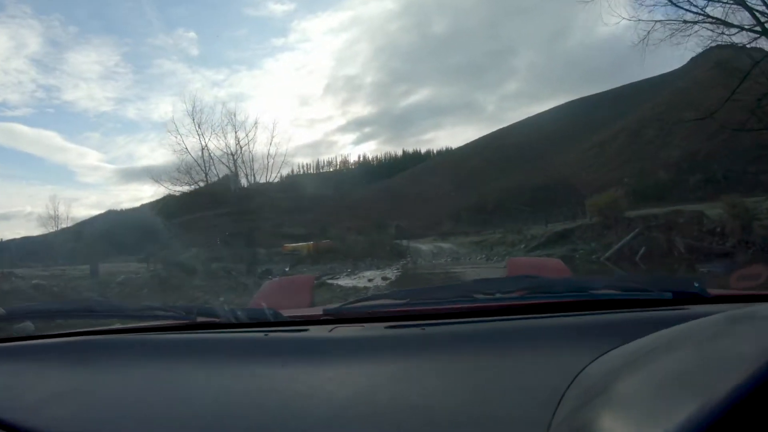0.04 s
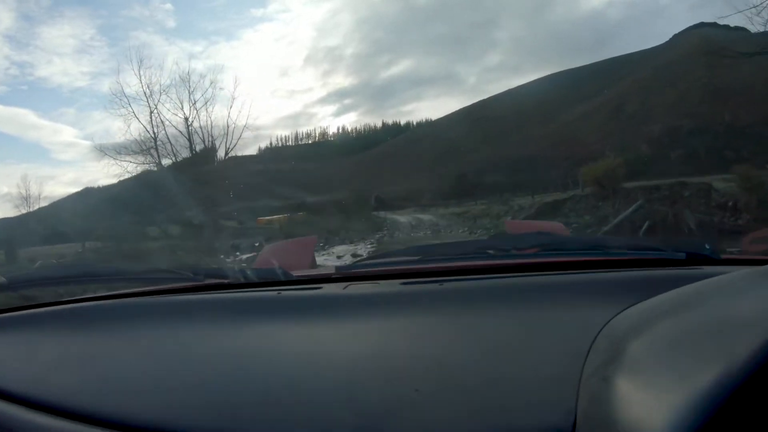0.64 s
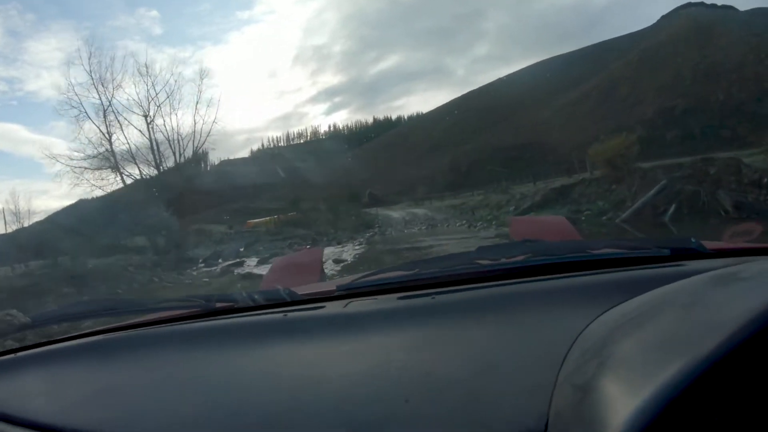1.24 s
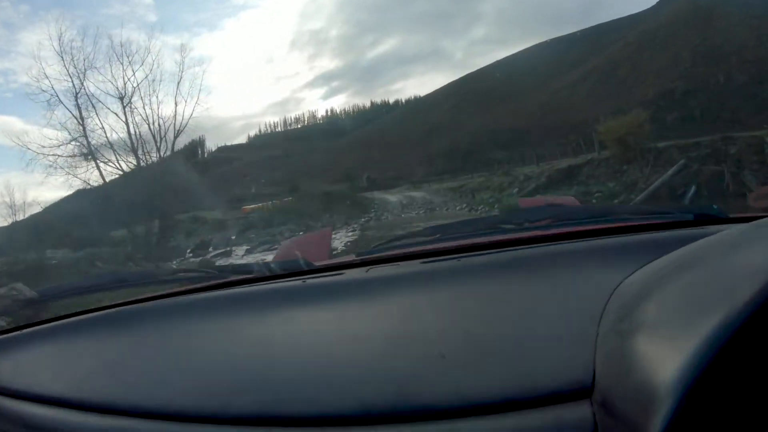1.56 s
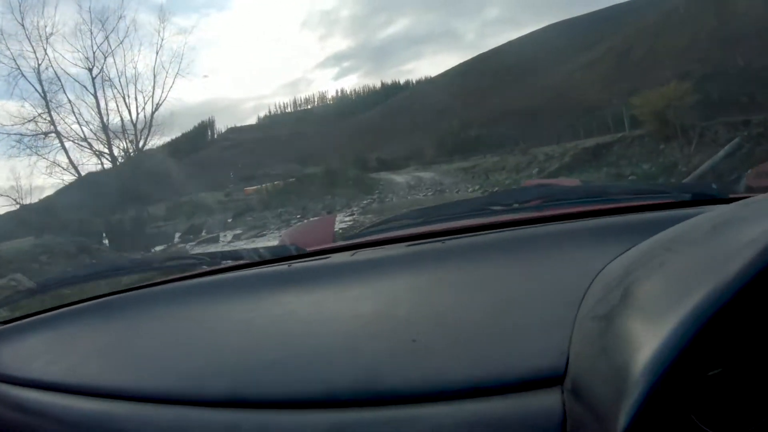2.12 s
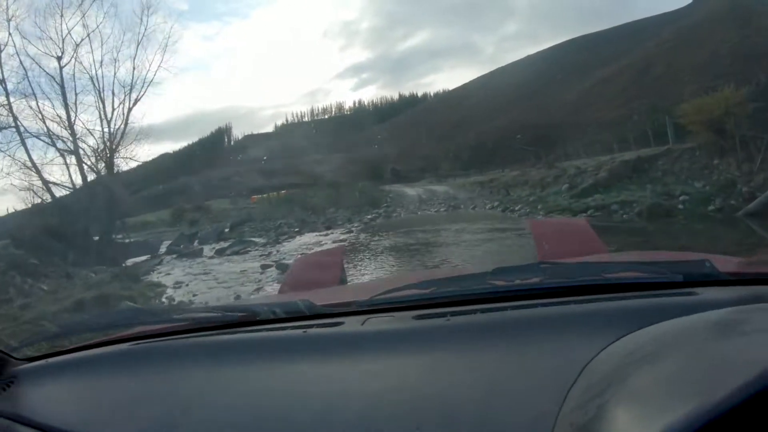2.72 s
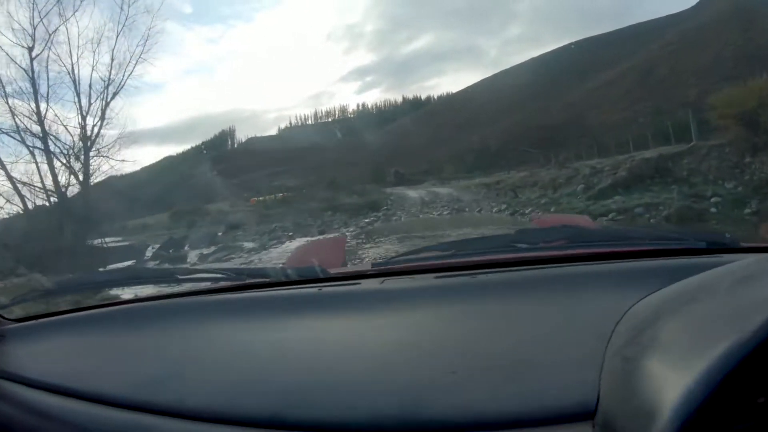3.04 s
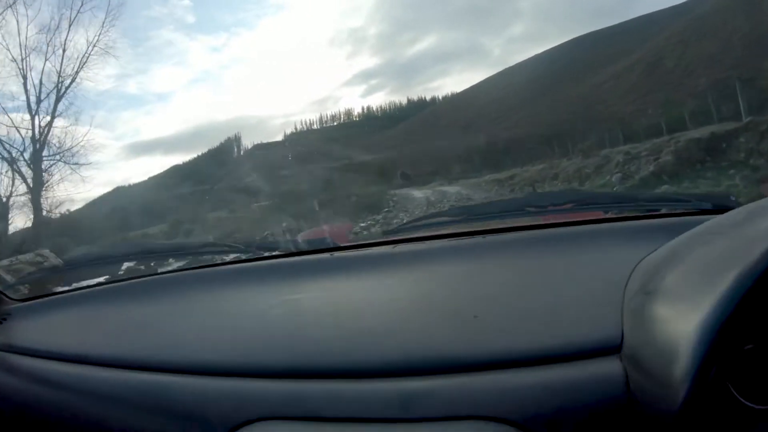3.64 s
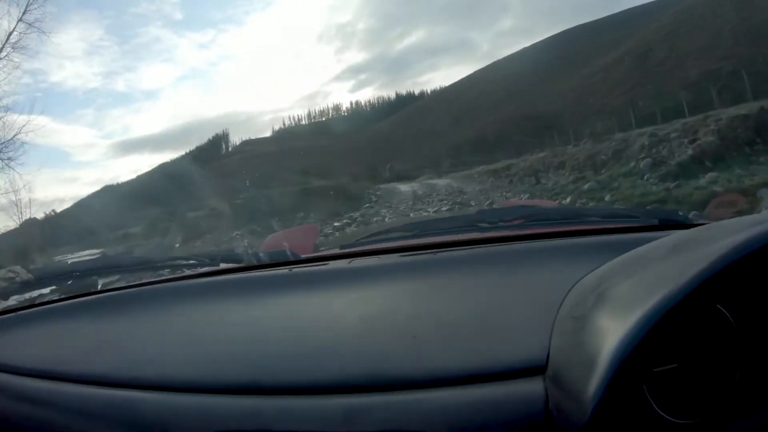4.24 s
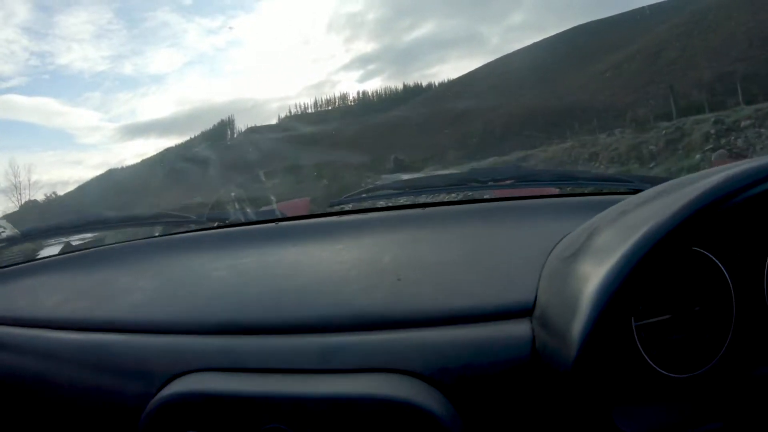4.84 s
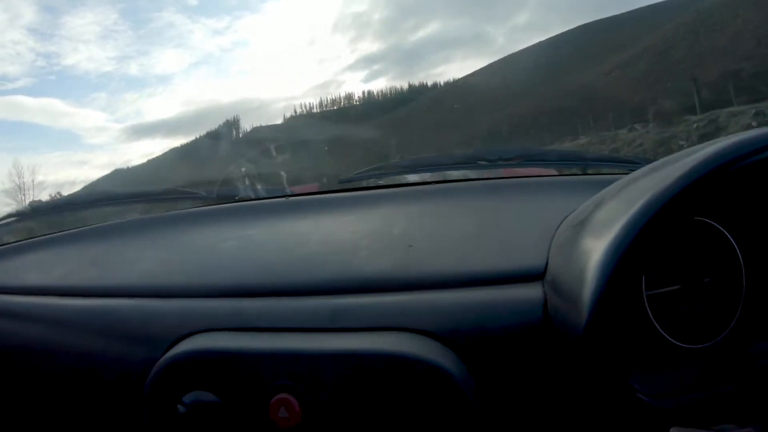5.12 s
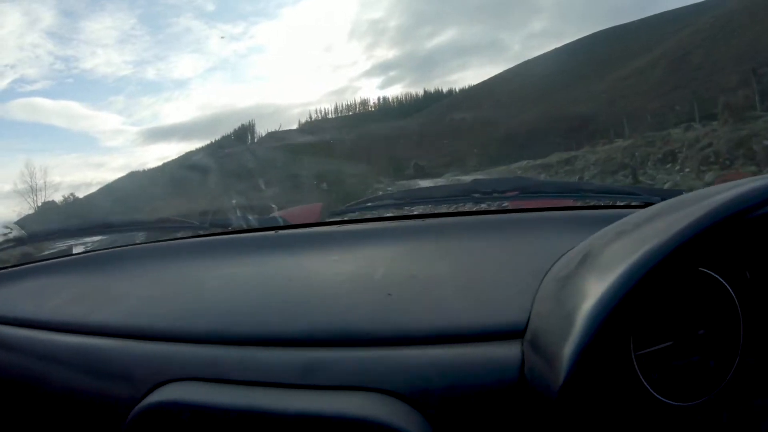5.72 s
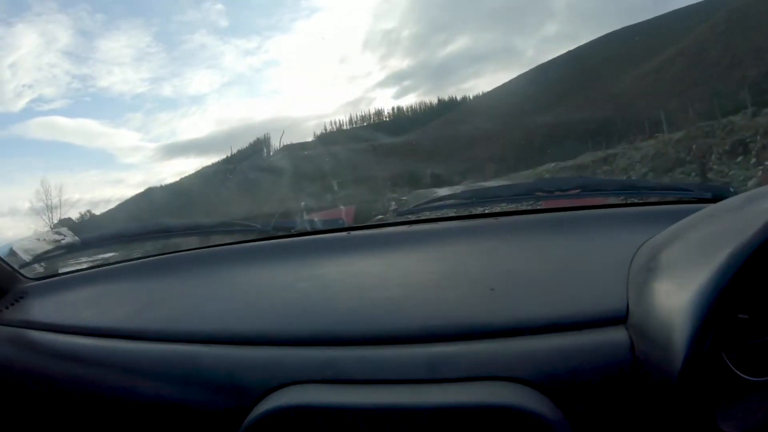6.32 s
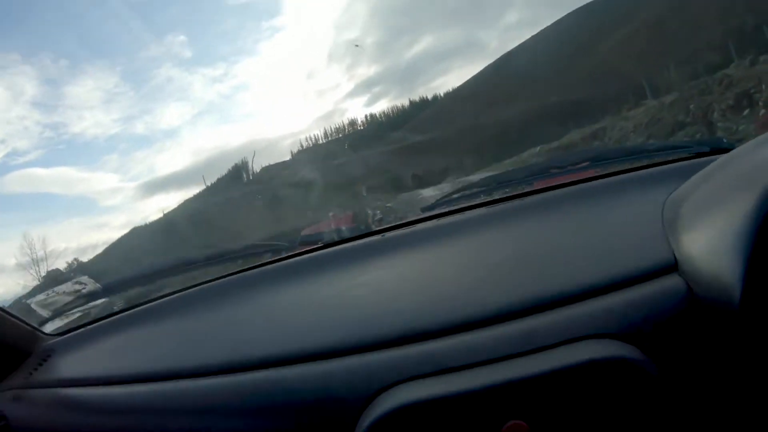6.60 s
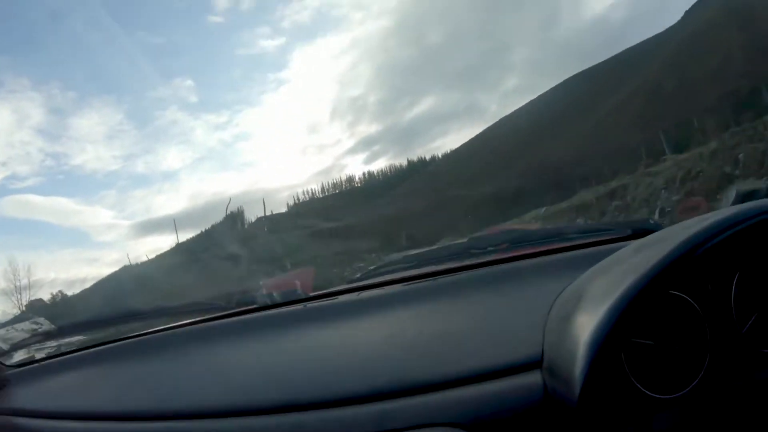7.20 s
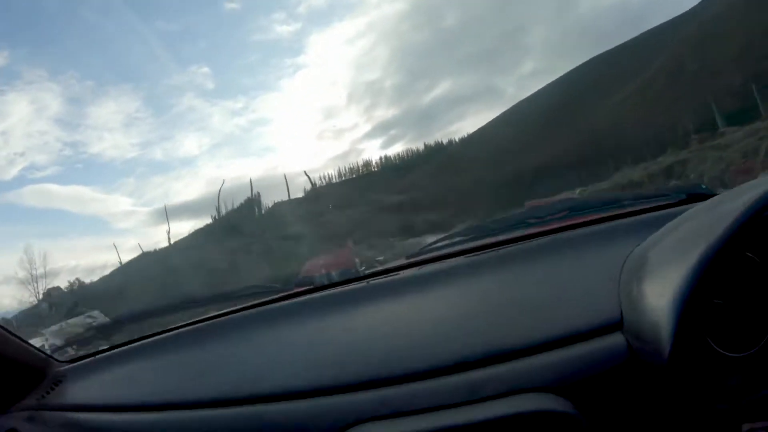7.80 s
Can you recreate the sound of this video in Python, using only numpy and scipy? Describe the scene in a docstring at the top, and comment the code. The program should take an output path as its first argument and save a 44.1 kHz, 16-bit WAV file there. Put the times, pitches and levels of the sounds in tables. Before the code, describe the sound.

A car's cabin booms over rough ground as stones crunch, the suspension thuds, loose metal rattles and the low engine finally revs twice.

```python
"""A deep boom and an engine lugging near idle fill the cabin of a small car on a wet, stony track.
The shell heaves on its springs, and the firing harmonics swell as they cross cabin resonances.
Tyres crunch through stones and water in countless small impacts. Bumps knock the suspension and
excite the modes of the shell, loose metal and keys rattle, and near the end the engine revs twice."""
import sys
import numpy as np
from scipy import signal
from scipy.io import wavfile
from scipy.ndimage import uniform_filter1d, minimum_filter1d

SR = 44100
rng = np.random.default_rng(int(sys.argv[2]) if len(sys.argv) > 2 else 0)


def master_out(mix):
    """Clip the mix to full scale and print it as 16-bit PCM to the path in sys.argv[1]."""
    frames = np.transpose(np.atleast_2d(mix))
    ceiling = np.clip(frames, -1, 1)
    pcm = np.round(ceiling * 32767).astype(np.int16)
    wavfile.write(sys.argv[1], SR, pcm)


N = 346434
TIME = np.arange(N) / SR

# Slow shaking of the shell. Each row: time in seconds, level in dB.
BOOM_LEVEL = [(0, -16), (1.7, -16), (2.2, -22.5), (2.8, -18.5), (4.3, -18), (5.4, -18.5), (6.1, -20),
              (7.86, -16.5)]
# The body drops into dips. Each row: crest in seconds, extra boom in dB.
HEAVES = [(2.94, 5), (3.58, 4.5), (5.69, 7.5), (6.76, 10), (7.44, 10)]
# Engine speed: near idle, then two pushes on the throttle. Each row: time in seconds, firings a second.
FIRING_RATE = [(0, 46), (2.2, 45.5), (3.9, 49), (4.3, 48.5), (4.5, 41), (4.7, 49), (5.1, 48.5), (5.35, 48),
               (6.0, 39.5), (6.12, 46), (6.2, 52), (6.3, 63), (6.39, 75), (6.5, 80.5), (6.62, 75),
               (6.76, 83), (6.88, 66), (7.0, 62), (7.1, 65.5), (7.2, 76), (7.28, 87), (7.36, 84.5),
               (7.46, 80), (7.58, 79), (7.7, 74), (7.86, 76)]
# Engine load. Each row: time in seconds, firing tone in dB, overtones in dB.
ENGINE_LOAD = [(0, -16.5, -31.5), (1.6, -20, -32.5), (2.6, -19.5, -31.5), (4.3, -21.5, -35),
               (4.9, -16.5, -24.5), (5.4, -32, -31), (6.12, -20, -37), (6.25, -20, -21.5),
               (6.42, -21.5, -22), (6.6, -23, -22.5), (6.85, -31, -30), (7.35, -28.5, -26.5),
               (7.86, -20.5, -32)]
# Resonances of the cabin air. Each row: centre in Hz, width in Hz, relative gain in dB.
CABIN_MODES = [(108, 27, 3), (156.8, 24, -0.5), (209, 20, -13), (309, 36, -16.5)]
# The exhaust note. Each row: time in seconds, level in dB.
EXHAUST_LEVEL = [(3.7, -42), (4.0, -32), (4.5, -36), (4.95, -28), (5.3, -42), (6.05, -39), (6.28, -28),
                 (6.42, -24.5), (6.6, -36), (6.75, -32), (6.87, -42), (7.05, -33), (7.3, -28.5), (7.6, -33),
                 (7.86, -35)]
# Spectra of boom, floor rumble, crunch, spray and gravel. Each row: frequency in Hz, relative dB.
BOOM_SPECTRUM = [(16, -10.5), (21, 0), (27, -2.5), (35, -5), (44, 1), (60, -7), (80, -14), (115, -24.5),
                 (180, -63.5)]
RUMBLE_SPECTRUM = [(60, -0.5), (115, -11), (155, 2.5), (210, -6), (270, -10.5), (320, -16), (430, -13),
                   (600, -27), (1000, -37), (2500, -46)]
CRUNCH_SPECTRUM = [(300, -3), (700, 7), (1150, 2), (1600, -0.5), (2300, -5), (3200, -8), (4200, -21),
                   (6000, -21), (12000, -43)]
SPRAY_SPECTRUM = [(2000, -12), (4000, -5.5), (6500, 2), (8300, 3), (10500, -6.5), (12000, -13),
                  (15000, -17)]
GRAVEL_SPECTRUM = [(1200, 4.5), (2200, 1.5), (3400, -1.5), (4200, -2), (5200, -13)]
# Suspension knocks. Each row: start in seconds; clonk (before its trim), thud, crack and clack in dB;
# clonk and thud centres in Hz; rebound delay in seconds; rebound and settling gains in dB.
KNOCKS = [(3.865, -33, -31, -47, -48, 716, 252, .02, -9, -16),
          (4.424, -21, -20.5, -43, -29, 1150, 245, 0.013, -6, -19),
          (4.481, -31, -32, -66, -42, 1110, 130, .02, -11, -20),
          (4.874, -20.5, -16, -42, -33, 790, 225, 0.025, 3.5, -15),
          (5.513, -25, -20, -48, -40, 780, 215, 0.027, 3, -16),
          (5.661, -15, -18.5, -32, -24.5, 860, 244.5, .012, -2.5, -16),
          (5.856, -16.5, -22.5, -50, -31, 620, 380, .015, 2, -21),
          (7.252, -27, -27, -39, -39, 699, 182, 0.018, -23, -24)]
# Modes of the body shell. Each row: frequency in Hz, relative gain in dB, t60 in seconds.
SHELL_MODES = [(98, 2, 0.15), (155, 16.5, 0.14), (197, 5.5, 0.13), (234.6, 7, 0.12), (317, 2, 0.082),
               (398, -10, 0.14), (448, 2, 0.095), (516, 2.5, 0.058), (650, 0.5, 0.043), (696, 4.5, 0.05),
               (893, -6.5, 0.069), (1060, -5, 0.098), (1190, -4, 0.025), (1230, -16, 0.03)]
# How hard the tyres work the ground. Each row: time in seconds, level in dB.
GROUND_LEVEL = [(0, -54.5), (.28, -67.5), (.5, -54.5), (1.35, -57), (2.3, -59.5), (3.1, -58), (3.35, -51.5),
                (3.7, -50.5), (4.25, -45), (4.6, -44.5), (5.25, -49.5), (5.6, -46), (6.05, -56), (6.3, -46),
                (7.0, -44.5), (7.25, -46.5), (7.45, -45.5), (7.86, -41.5)]
# Ruts raise the rumble, stone heaps the ground work, and puddles the spray and key jostle.
# Each row: crest in seconds, boost in dB, half length in seconds.
RUTS = [(0.888, 6, 0.071), (1.116, 3.5, 0.059), (2.777, 6.5, 0.069)]
STONE_HEAPS = [(0.397, 8.5, 0.05), (0.923, 0, 0.22), (1.792, 7, 0.19), (2.727, 8, 0.3), (3.472, 6, 0.17),
               (6.717, 9.5, 0.093), (7.383, 9, 0.093), (7.85, 5, 0.032)]
PUDDLES = [(2.954, 2.5, 0.28), (4.927, 9, 0.1), (5.393, 6, 0.091), (7.516, 4.5, 0.91)]
# Larger stones shift. Each row: start in seconds, knock in dB, scrape in dB.
STONES = [(0.054, -40, -52), (0.365, -47, -65), (0.386, -46, -61), (.408, -49, -61), (.467, -44, -59),
          (0.588, -55, -54), (.612, -49, -56), (.664, -49, -57), (.803, -57, -53.5), (.837, -49, -68),
          (.856, -42, -56), (.892, -41, -60), (0.959, -44, -58), (0.991, -42, -60), (1.039, -51, -66),
          (1.09, -42.5, -61), (1.159, -57, -58), (1.303, -45, -67), (1.536, -48, -53.5),
          (1.609, -43.5, -55), (1.721, -48, -51), (1.802, -41, -50), (1.885, -44.5, -56), (1.968, -53, -55),
          (2.132, -60, -60), (2.299, -62, -67), (2.408, -58, -53), (2.664, -42.5, -66), (2.689, -38, -51),
          (2.796, -38.5, -63), (2.858, -41, -52), (2.914, -51, -68), (3.307, -46, -61), (3.521, -34.5, -63),
          (4.024, -38, -59)]
# Gravel thrown up by the tyres. Each row: start in seconds, length in seconds, level in dB.
GRAVEL_RUNS = [(.375, 0.059, -52), (0.58, 0.12, -61), (0.799, 0.23, -61), (1.6, 0.054, -54),
               (1.73, 0.24, -55), (2.645, 0.15, -57), (3.043, 0.029, -49.5), (3.313, 0.36, -50.5),
               (3.794, 0.14, -50), (4.02, 0.41, -55), (6.45, 0.1, -51), (6.887, 0.15, -51),
               (7.08, .09, -50), (7.33, 0.2, -48.5), (7.63, 0.3, -49.5)]
# The wheels plough through a puddle. One row: crest in seconds, level in dB, half length in seconds.
SPLASH = (6.715, -40.5, .045)
# A loose fitting clinks; dashboard parts ping. Each row: start in seconds, peak in dB, pitch in Hz.
CLINKS = [(3.1617, -30, 2100), (3.8058, -20.5, 2140), (3.8214, -31, 2210), (4.324, -29, 2160),
          (6.1847, -35, 2030), (6.918, -33, 2080)]
PINGS = [(2.565, -42.5, 4130), (2.610, -43, 5900), (2.712, -51, 5340), (2.982, -47, 4200),
         (3.115, -54, 4200), (3.208, -49, 5560), (3.277, -45, 4580), (4.573, -43, 4680), (4.614, -42, 5930)]
# Keys ring; dry clicks of pebbles or trim are heard alone or with them.
# Each row: start in seconds, key ring in dB, pebble or trim click in dB.
RINGS_AND_CLICKS = [(2.607, -59, -58), (2.702, -63, -57), (2.757, -39, -53.5), (3.015, -52, -62),
                    (3.044, -50, -54), (3.178, -44, -55), (3.205, -47, -60), (3.349, -38, -68),
                    (3.435, -43, -56), (3.486, -48, -56), (3.6461, -47, -56), (3.714, -45, -57),
                    (4, -42, -54.5), (4.101, -48, -63), (4.2917, -34, -48), (4.3324, -52, -48.5),
                    (4.367, -39, -54), (4.382, -36, -57), (4.5436, -42, -61), (4.613, -39, -58),
                    (4.737, -35, -71), (5.004, -37.5, -65), (5.3018, -41, -64), (5.754, -40, -67),
                    (6.3133, -39.5, -67), (6.4588, -40, -61), (7.417, -33, -49), (7.433, -34, -61),
                    (7.483, -32, -55), (7.5123, -29, -48.5), (7.546, -34, -52), (7.798, -32.5, -60)]
# A dangling steel piece is struck. Each row: start in seconds, gain in dB.
JINGLES = [(2.56, -53), (2.979, -52), (3.113, -66), (3.815, -47.5), (7.164, -43.5), (7.2515, -45),
           (7.5789, -41), (7.61, -45), (7.689, -30.5), (7.738, -37), (7.822, -51)]
# Modes of the fitting and the steel piece. Each row: frequency in Hz, relative dB, t60 in seconds.
FITTING_MODES = [(2090, -10, 0.01), (2280, 7, 0.027), (2260, -11, 0.013), (2600, -13, .015),
                 (3220, -15, 0.022), (4420, -20, 0.027)]
STEEL_MODES = [(4250, -8, 0.018), (4950, -12, .025), (6200, -16, 0.098), (6750, -10, 0.034),
               (7200, -23, 0.18), (8500, -11, 0.031), (8560, -9, 0.066), (8700, -3, 0.095),
               (10450, -9, 0.08), (13600, -21, 0.05)]
# Dense clusters of key modes. Each row: low and high edges in Hz, relative dB, t60 in seconds.
KEY_BANDS = [(10060, 11200, -0.5, 0.026), (12600, 13500, -6, 0.024), (7840, 18000, -9.5, 0.023)]
# Modes of a dashboard part. Each row: multiple of its pitch, relative dB, t60 in seconds.
PING_MODES = [(1, -3, 0.022), (1.071, -3, .015), (1.37, -6, .01)]
# Trim squeaks under the hardest jolt. One row: crest in seconds, pitch in Hz, half length in seconds.
SQUEAK = (5.675, 6680, .004)
# Coherence of the cabin sound. Each row: frequency in Hz, left-right correlation.
COHERENCE = [(30, 1), (160, 1), (300, 0.98), (500, 0.94), (800, 0.27), (1500, 0.12), (3800, 0.56),
             (6000, 0), (9000, 0), (14000, 0.16)]
# The stereo image opens out. Each row: time in seconds, share of the side signal.
STEREO_WIDTH = [(0, 0.0039), (1.45, 0.014), (2.0, 0.37), (2.6, 0.67), (3.3, 0.83), (4.5, 0.95)]


def boom(heave_half_s=0.062):
    """Forced vibration: the shell shakes on its springs with fairly even strength, harder in dips."""
    shaking = coloured(BOOM_SPECTRUM, flicker_db=4, flicker_hz=4.7)
    running_rms = np.sqrt(uniform_filter1d(shaking[0] ** 2, size=6000))
    heave_db = sum(db * swell(s, heave_half_s) for s, db in HEAVES)
    return from_db(in_time(BOOM_LEVEL)[0] + heave_db) * shaking / running_rms


def engine(crank, firing_hz, roughness=0.076, odd_db=-7):
    """Periodic forcing: firings make a tone, exhaust puffs and harmonics that the cabin resonates to."""
    tone_db, overtones_db = in_time(ENGINE_LOAD)
    tone = (np.sin(2 * crank) + from_db(-9) * np.sin(crank)) * (1 + roughness * drift(21))
    overtones = 0
    for order in range(3, 13):
        hz = order * firing_hz / 2
        resonance = sum(from_db(db) / (1 + (2 * (hz - centre) / width) ** 2)
                        for centre, width, db in CABIN_MODES)
        strength = from_db(odd_db * (order % 2)) * (1 + drift(13))   # no two firings are equal
        overtones += resonance * strength * np.sin(order * crank + rng.uniform(0, 2 * np.pi))
    puffs = rng.standard_normal(N) * (1 + np.cos(2 * crank))
    blast = band(band(puffs, 129, 183), 103, 242)
    growl = rms_one(overtones) + from_db(-10) * rms_one(blast)
    return from_db(tone_db) * rms_one(tone) + from_db(overtones_db) * rms_one(growl)


def exhaust(crank, waver=0.4, stagger_rad=0.55):
    """Modulation: uneven firings shake the phase and strength of a note at twice the firing rate."""
    note = np.sin(4 * crank + stagger_rad * drift(16)) * (1 + waver * drift(20))
    return from_db(in_time(EXHAUST_LEVEL)[0]) * rms_one(note)


def suspension(taps=6, gap_s=0.016, loss_db=3):
    """Inelastic impact: the suspension hits its stop, rebounds duller and settles in fading taps."""
    out = np.zeros((2, N))
    for (s, clonk_db, thud_db, crack_db, clack_db,
         clonk_hz, thud_hz, delay_s, rebound_db, settle_db) in KNOCKS:
        contact = spread(burst(t60=0.028, rise_s=0.0002, size=2500), 600)
        clack = band(band(contact, 700, 1600), 600, 1800)
        add(out, s, at_level(clack, clack_db))
        add(out, s, blow(clonk_db, thud_db, crack_db, clonk_hz, thud_hz))
        rebound = blow(clonk_db - 1, thud_db, crack_db, 0.58 * clonk_hz, 0.89 * thud_hz)
        add(out, s + delay_s, from_db(rebound_db) * rebound)
        for k, late_s in enumerate(np.cumsum(gap_s * rng.uniform(0.44, 1.8, taps))):
            touch = spread(burst(t60=0.077, size=2500), 500)
            thud = at_level(band(touch, 132, 362), thud_db + rebound_db)
            clonk = at_level(band(touch, 350, 930), clonk_db - 9.5)
            add(out, s + delay_s + late_s, from_db(settle_db - loss_db * k) * (thud + clonk))
    return out


def blow(clonk_db, thud_db, crack_db, clonk_hz, thud_hz, clonk_trim_db=-9):
    """Impulse response: the shell thuds and clonks, trim chatters and loose panels shudder on."""
    thud = shell(thud_hz, contact_t60=0.024)
    clonk = pan(-3) * shell(clonk_hz, contact_t60=0.028)
    chatter = spread(burst(t60=0.09, rise_s=0.0006), 2700)
    crack = band(chatter, 690, 2770) + from_db(-22) * band(chatter, 2500, 6700)
    panels = spread(burst(t60=0.28, rise_s=0.0081), 400)
    shudder = band(panels, 150, 375) + from_db(-15) * band(panels, 386, 840)
    return (at_level(thud, thud_db) + at_level(clonk, clonk_db + clonk_trim_db)
            + at_level(crack, crack_db) + at_level(shudder, thud_db - 12.5))


def shell(centre_hz, contact_t60, octaves=0.51, detune=0.026):
    """Modal excitation: a blow rings the modes near a centre; flexing detunes them from blow to blow."""
    out = 0
    for hz, db, t60 in SHELL_MODES:
        weight = from_db(db) / (1 + (np.log2(hz / centre_hz) / octaves) ** 4)
        out += weight * ring(spread(burst(contact_t60), hz), hz * np.exp(detune * rng.normal()), t60)
    return out


def tyres(crank, work_db, wet_db, throb=0.038):
    """Rolling noise: the floor rumbles, stones crunch with each firing's pull, drops hit the arches."""
    rumble = coloured(RUMBLE_SPECTRUM, flicker_db=2.5, flicker_hz=19.5)
    rumble *= from_db(-31 + 0.3 * work_db + swells(RUTS))
    crushing = grains(per_s=510, size_db=4.5, life_s=0.016) * (1 + throb * np.sin(2 * crank))
    crunch = coloured(CRUNCH_SPECTRUM, flicker_db=2, flicker_hz=4.4, grain=crushing)
    crunch *= from_db(-45 + work_db)
    drops = grains(per_s=490, size_db=3.5, life_s=0.0035)
    spray = coloured(SPRAY_SPECTRUM, flicker_db=2, flicker_hz=17, grain=drops)
    spray *= from_db(-65 + 1.08 * wet_db)
    return rumble + crunch + low_pass(spray, 11300, order=10)


def pebbles(work_db, clump_db=4.5):
    """Transmission through a panel: pebbles shift in random clumps, coloured by the floor pan."""
    shifts = stereo_noise(3300) * grains(per_s=40, size_db=2.8, life_s=0.0055)
    inside = (band(shifts, 450, 1355) + from_db(-8.5) * band(shifts, 2140, 3530)
              + from_db(-26.5) * band(shifts, 3000, 5200))
    return from_db(-51.5 + 0.66 * work_db + clump_db * np.tanh(drift(4.9))) * rms_one(inside)


def stones(pitch_spread=0.38, ragged_db=5, step_samples=160):
    """Impact and friction: each stone knocks the floor pan and scrapes raggedly at its own pitch."""
    out = np.zeros((2, N))
    for s, knock_db, scrape_db in STONES:
        pitch = np.exp(pitch_spread * rng.uniform(-1.8, 1))
        knock = band(spread(burst(t60=0.061, rise_s=0.0011), 900), 520 * pitch, 1250 * pitch)
        friction = spread(burst(t60=0.065, rise_s=0.0036), 4100)
        size = friction.shape[1]
        steps_db = ragged_db * np.clip(rng.standard_normal(size), -1, 1)
        friction *= from_db(np.repeat(steps_db, step_samples)[:size])
        hiss = band(band(friction, 3900, 7500), 3900, 7500)
        scrape = band(friction, 2000 * pitch, 3400 * pitch) + from_db(-14) * hiss
        add(out, s, at_level(knock, knock_db) + at_level(scrape, scrape_db))
    return out


def gravel(per_s=380, size_db=1.5, pitch_count=14, t60_cycles=11, edge_s=0.01):
    """Damped ringing: runs of gravel pelt the wheel arches, each grain sounding for a few cycles."""
    gates = sum(from_db(db) * ((TIME > s) & (TIME < s + length)) for s, length, db in GRAVEL_RUNS)
    sizes = from_db(size_db * np.minimum(rng.exponential(1, N), 3))
    hits = rng.random(N) < per_s / SR
    clicks = stereo_noise(3000) * sizes * hits
    pitch_index = rng.integers(0, pitch_count, N)
    grit = 0
    for k, hz in enumerate(np.geomspace(GRAVEL_SPECTRUM[0][0], GRAVEL_SPECTRUM[-1][0], pitch_count)):
        gain = from_db(at_hz(GRAVEL_SPECTRUM, hz)) * np.sqrt(hz)   # offsets the shorter ring up high
        grit += gain * ring(clicks * (pitch_index == k), hz, t60_cycles / hz)
    return uniform_filter1d(gates, int(edge_s * SR) + 1) * rms_one(grit)


def splash():
    """Dense impacts merge into noise as a sheet of water slaps the floor pan and wheel arches."""
    s, db, half_s = SPLASH
    water = stereo_noise(2500) * grains(per_s=2000, size_db=2, life_s=0.002)
    slap = band(water, 1460, 3900) + from_db(-29) * band(water, 4150, 8400)
    return from_db(db) * swell(s, half_s) * rms_one(slap)


def fitting(reference_hz=2230):
    """Free vibration: a loose metal fitting clinks, its modes scaled to the pitch of each touch."""
    out = np.zeros((2, N))
    for s, db, pitch_hz in CLINKS:
        modes = [(hz * pitch_hz / reference_hz, level, t60) for hz, level, t60 in FITTING_MODES]
        add(out, s, from_db(db) * strike(modes, contact_t60=0.058, detune=0.014))
    return out


def keys_and_clicks(keys_pan_db=5, bounce_s=0.013, bounce_db=-14):
    """Collision: keys ring and bounce once on the left; pebbles or trim click dryly in the centre."""
    out = np.zeros((2, N))
    for s, key_db, click_db in RINGS_AND_CLICKS:
        click = band(spread(burst(t60=0.083, rise_s=0.0013), 4200), 2800, 8600)
        add(out, s, at_level(click, click_db))
        add(out, s, from_db(key_db) * pan(keys_pan_db) * key_ring())
        add(out, s + bounce_s * rng.uniform(0.65, 2.3),
            from_db(key_db + bounce_db) * pan(keys_pan_db) * key_ring())
    return out


def key_ring(detune=0.0078):
    """Modal overlap: a key's crowded modes sound as decaying bands of noise; peak 1."""
    pitch = np.exp(detune * rng.normal())
    clusters = sum(from_db(db) * band(spread(burst(t60), low), low * pitch, high * pitch)
                   for low, high, db, t60 in KEY_BANDS)
    sound = low_pass(clusters, 12500, order=8)
    return sound / np.abs(sound).max()


def steel(pan_db=-8):
    """Light damping: a dangling steel piece on the right rings on after the scuff of each contact."""
    out = np.zeros((2, N))
    for s, db in JINGLES:
        scuff = from_db(8) * band(spread(burst(t60=0.041), 8000), 7300, 8800)
        ringing = strike(STEEL_MODES, contact_t60=0.08, detune=0.0032)
        add(out, s, from_db(db) * pan(pan_db) * (ringing + scuff))
    return out


def dashboard():
    """Heavy damping: small loose parts ping briefly in three inharmonic modes."""
    out = np.zeros((2, N))
    for s, db, pitch_hz in PINGS:
        modes = [(ratio * pitch_hz, level, t60) for ratio, level, t60 in PING_MODES]
        add(out, s, from_db(db) * strike(modes, contact_t60=0.052))
    return out


def squeak(level_db=-38):
    """Friction tone: plastic trim slips for a few milliseconds."""
    s, hz, half_s = SQUEAK
    return from_db(level_db) * swell(s, half_s) * np.sin(2 * np.pi * hz * TIME)


def valves(crank, level_db=-58, depth=0.27):
    """Amplitude modulation: valve noise pulses faintly through the bulkhead, twice a turn."""
    noise = stereo_noise(1900) * (1 + depth * np.cos(2 * crank))
    return from_db(level_db) * rms_one(band(noise, 1100, 1500) + from_db(-9) * band(noise, 1400, 3300))


def key_jostle(wet_db):
    """Random excitation: the keys touch lightly, louder as the going gets rougher."""
    touches = stereo_noise(10000) * grains(per_s=25, size_db=-0.5, life_s=0.0029)
    clusters = sum(from_db(db) * band(touches, low, high) for low, high, db, _ in KEY_BANDS)
    return from_db(-80 + 1.4 * wet_db) * pan(2) * rms_one(low_pass(clusters, 12500, order=8))


def strike(modes, contact_t60, detune=0):
    """Superposition: each mode of a small metal part is driven by its own contact noise; peak 1."""
    sound = 0
    for hz, db, t60 in modes:
        force = spread(burst(contact_t60), hz)
        sound += from_db(db) * ring(force, hz * np.exp(detune * rng.uniform(-3.1, 1)), t60)
    return sound / np.abs(sound).max()


def ring(force, hz, t60):
    """Damped oscillator: a unit impulse starts a decaying sine of height 1."""
    r, w = from_db(-60 / (t60 * SR)), 2 * np.pi * hz / SR
    return signal.lfilter([0, np.sin(w)], [1, -2 * r * np.cos(w), r * r], force + 1e-18)


def burst(t60, rise_s=0.00055, size=11000):
    """Exponential decay: two independent runs of contact noise rise quickly and die away."""
    t = TIME[:size]
    return rng.standard_normal((2, size)) * from_db(-60 * t / t60) * (1 - np.exp(-t / rise_s))


def grains(per_s, size_db, life_s):
    """Shot noise: the envelope of tiny random impacts whose energies add; rms 1."""
    hits = rng.random(N) < per_s / SR
    energy = hits * from_db(size_db * np.minimum(rng.exponential(1, N), 4)) ** 2
    return rms_one(np.sqrt(signal.lfilter([1], [1, -np.exp(-1 / (life_s * SR))], energy + 1e-12)))


def coloured(spectrum, flicker_db, flicker_hz, grain=1):
    """Spectral shaping: stereo noise under a grain envelope, in bands that each flicker; rms 1."""
    edges = np.geomspace(spectrum[0][0], spectrum[-1][0], num=2 * len(spectrum) - 3)
    noise = rng.standard_normal((2, 2, N)) * grain
    out = 0
    for k, (low, high) in enumerate(zip(edges, edges[1:])):
        hz = np.sqrt(low * high)
        gain = from_db(at_hz(spectrum, hz) + flicker_db * drift(flicker_hz))
        out += gain * spread(band(noise[k % 2], low, high), hz)
    return rms_one(out)


def drift(rate_hz, step=40):
    """Slow random fluctuation: low-passed noise of rms about 1."""
    r = np.exp(-2 * np.pi * step * rate_hz / SR)
    slow = signal.lfilter([1], [1, -2 * r, r * r], rng.standard_normal(N // step + 2002))[2000:]
    return np.interp(np.arange(N) / step, np.arange(len(slow)), rms_one(slow))


def spread(pair, hz):
    """Partial coherence: two independent signals become left and right, most alike in the bass."""
    alike = np.clip(at_hz(COHERENCE, hz), -1, 1)
    mid, side = np.sqrt(1 + alike) * pair[0], np.sqrt(1 - alike) * pair[1]
    return np.array([mid + side, mid - side]) / np.sqrt(2)


def stereo_noise(hz):
    """White noise with the cabin's coherence at hz."""
    return spread(rng.standard_normal((2, N)), hz)


def swell(s, half_s):
    """Gaussian envelope: 1 at time s, 1/e at half_s to either side."""
    return np.exp(-np.minimum(((TIME - s) / half_s) ** 2, 50))


def swells(rows):
    """Sum of Gaussian boosts, in dB."""
    return sum(db * swell(s, half_s) for s, db, half_s in rows)


def band(x, low_hz, high_hz):
    """Butterworth band-pass."""
    return signal.sosfilt(signal.butter(2, [low_hz, high_hz], "band", fs=SR, output="sos"), x)


def low_pass(x, hz, order):
    """Butterworth low-pass."""
    return signal.sosfilt(signal.butter(order, hz, fs=SR, output="sos"), x)


def from_db(db):
    """Decibels to amplitude."""
    return 10 ** (np.asarray(db) / 20)


def rms_one(x):
    """Scale to rms 1."""
    return x / np.sqrt(np.mean(x ** 2) + 1e-20)


def at_level(sound, db):
    """Give the first 20 ms of a blow this rms level."""
    return from_db(db) * sound / np.sqrt(np.mean(sound[:, :900] ** 2))


def pan(db):
    """Gains for a level difference; positive is left."""
    return from_db(np.array([[db], [-db]]) / 2)


def in_time(rows):
    """Interpolate each column of a curve at every sample."""
    s, *columns = np.transpose(rows)
    return [np.interp(TIME, s, column) for column in columns]


def at_hz(spectrum, hz):
    """Read a spectrum on a log-frequency axis."""
    frequencies, values = np.transpose(spectrum)
    return np.interp(np.log(hz), np.log(frequencies), values)


def add(out, s, sound):
    """Mix a short sound in at time s."""
    at = int(s * SR)
    out[:, at:at + sound.shape[1]] += sound[:, :N - at]


def limit_bass(x, ceiling_db=-10, corner_hz=110, hold_s=0.0063):
    """Limiting: the bass dips briefly whenever it swings past a ceiling."""
    bass = signal.sosfiltfilt(signal.butter(2, corner_hz, fs=SR, output="sos"), x)
    span = int(hold_s * SR) + 1
    gain = np.minimum(1, from_db(ceiling_db) / (np.abs(bass).max(axis=0) + 1e-9))
    return x + bass * (uniform_filter1d(minimum_filter1d(gain, span), span) - 1)


def scene():
    """Superposition: engine, shell, track and rattles add in the cabin."""
    firing_hz = in_time(FIRING_RATE)[0] * (1 + 0.0076 * drift(5.66))
    crank = np.pi * np.cumsum(firing_hz) / SR   # angle in radians: two firings a turn
    work_db = in_time(GROUND_LEVEL)[0] + 49 + swells(STONE_HEAPS)   # 0 dB on ordinary ground
    wet_db = work_db + swells(PUDDLES)
    track = tyres(crank, work_db, wet_db) + pebbles(work_db) + stones() + gravel() + splash()
    motor = engine(crank, firing_hz) + exhaust(crank) + valves(crank)
    body = boom() + suspension()
    rattles = fitting() + keys_and_clicks() + steel() + dashboard() + key_jostle(wet_db) + squeak()
    return motor + body + track + rattles


def record(dry):
    """The bass is limited, the image opens out leaning slightly right, and the top ends at 16 kHz."""
    pair = limit_bass(dry) * pan(-0.56)
    mid = pair.mean(axis=0)
    pair = mid + in_time(STEREO_WIDTH)[0] * (pair - mid)
    return signal.sosfilt(signal.cheby2(12, 70, 16000, fs=SR, output="sos"), pair)


dry = scene()
out = record(dry)
master_out(out)
```